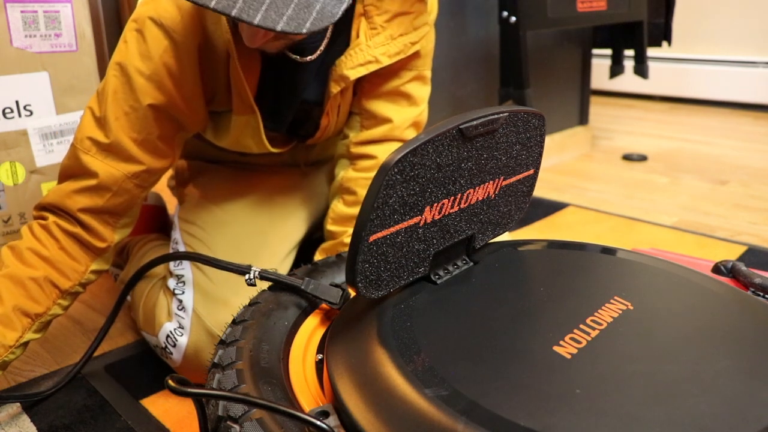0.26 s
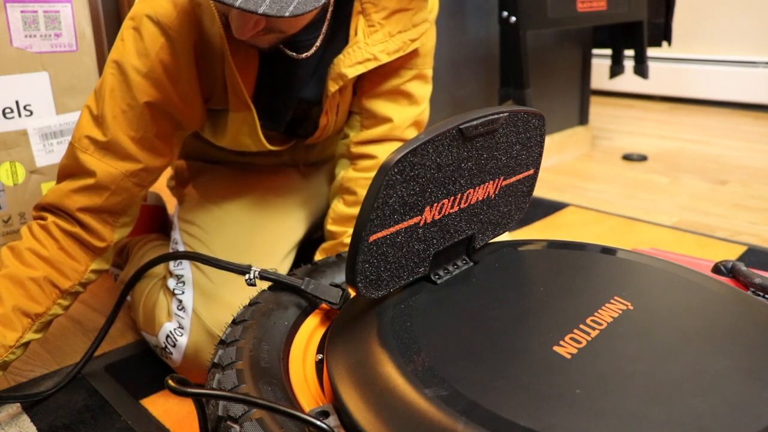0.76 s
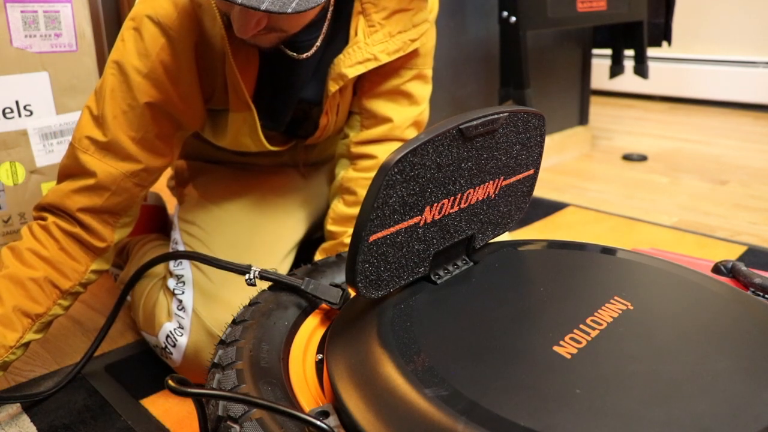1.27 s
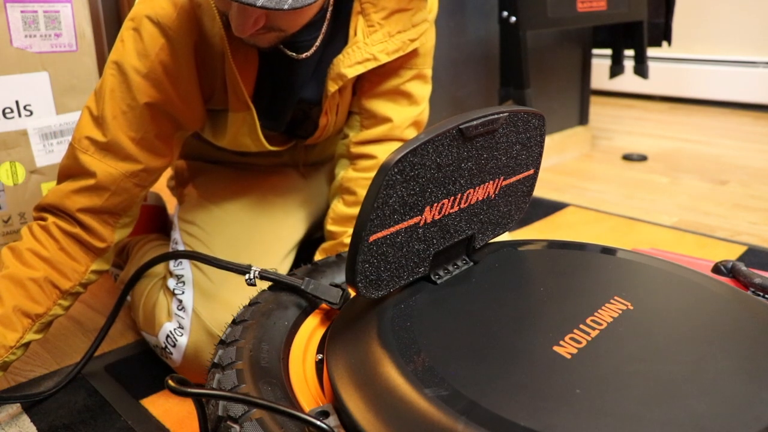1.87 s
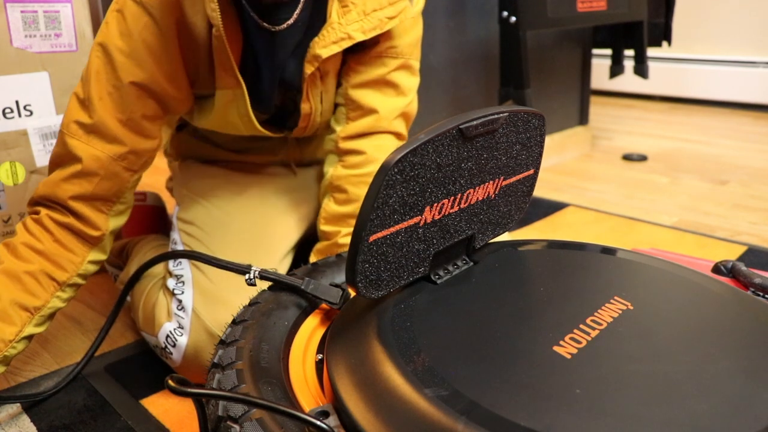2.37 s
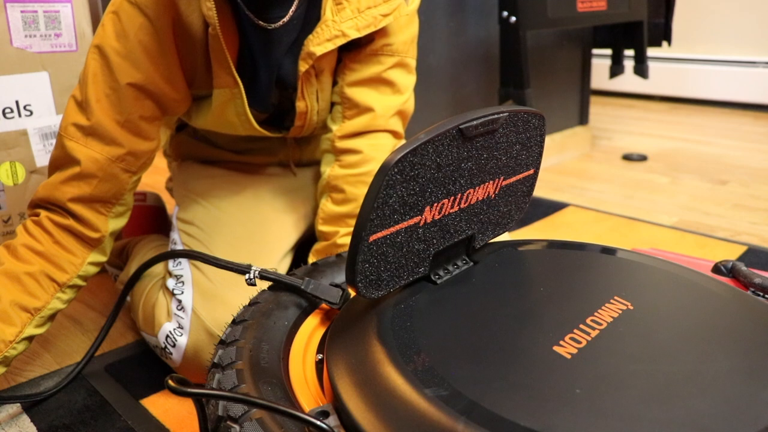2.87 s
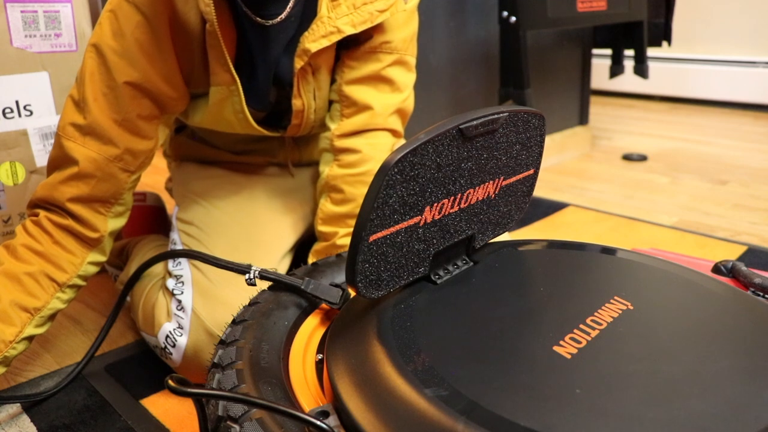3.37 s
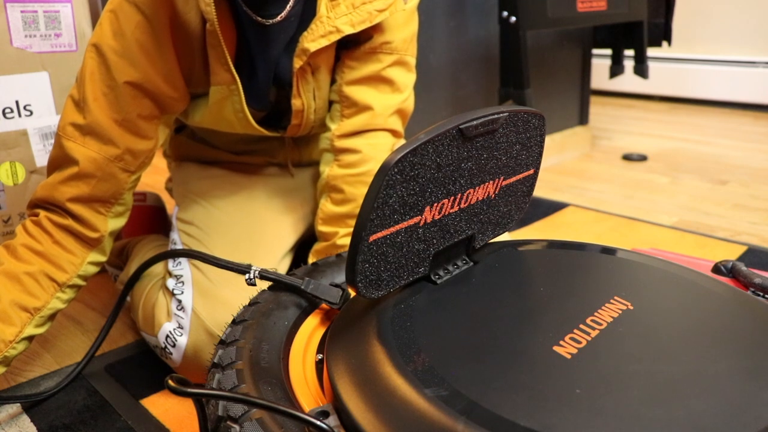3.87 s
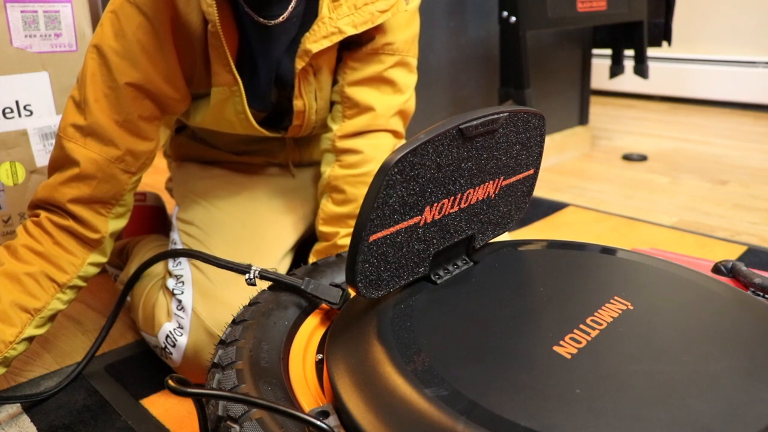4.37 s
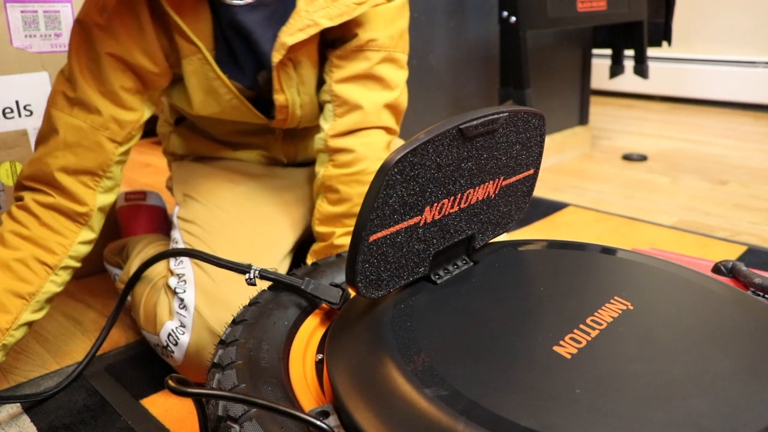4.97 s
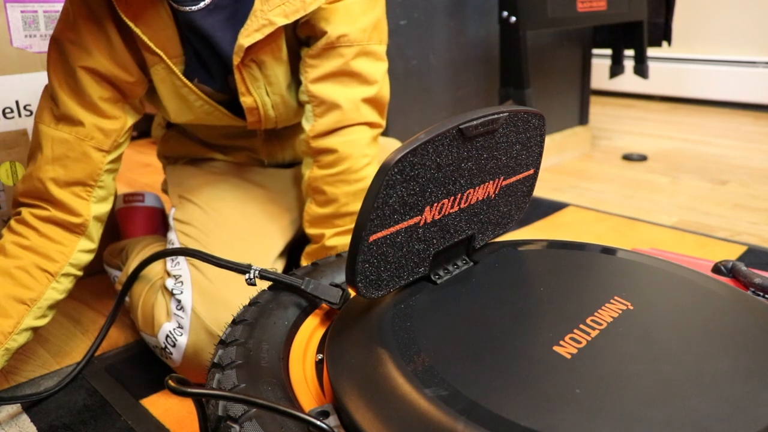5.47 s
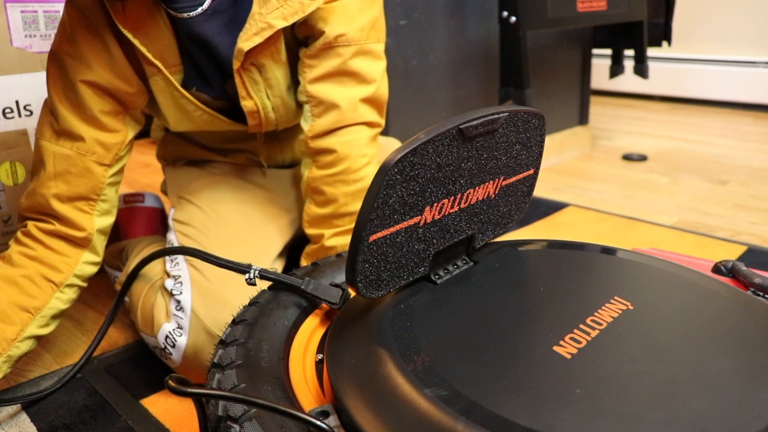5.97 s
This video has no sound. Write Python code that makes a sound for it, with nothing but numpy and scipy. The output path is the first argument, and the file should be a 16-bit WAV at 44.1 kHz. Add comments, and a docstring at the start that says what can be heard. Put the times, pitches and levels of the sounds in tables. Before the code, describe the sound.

Steady buzz and airy hiss of a small electric tyre pump, its low hum swelling against a wooden floor.

```python
"""Indoors, close on one microphone: a small electric piston pump on a wooden floor inflates a tyre.
It is already running at 103 strokes a second, roughened by its gears. Each stroke gives a low hum, a
pulse of air, a ring of the housing and a rattle; a valve ticks and air rasps through it. At 2.1 s the
pump is pressed to the floor and the hum swells; the rattle dips around 3.75 s. A second press at 4.9 s
eases off towards the end. All along, the pump slows a little as the pressure builds."""
import sys
import numpy as np
from scipy import signal
from scipy.fft import rfft, irfft, next_fast_len
from scipy.io import wavfile
from scipy.ndimage import map_coordinates

SR = 44100
rng = np.random.default_rng(int(sys.argv[2]) if len(sys.argv) > 2 else 0)


def store_wav(level_fs):
    """Save 16-bit WAV to argv[1]."""
    pcm = np.round(np.clip(np.atleast_2d(level_fs), -1, 1) * 32767)
    wavfile.write(sys.argv[1], SR, pcm.T.astype(np.int16))


N = 273861


def piston(turn, uneven, pulse_db, ring_db, rattle_db):
    """Front of the scene: each turn pushes out air, knocks the housing and rattles the linkage."""
    # play in the gears hurries or delays each stroke
    pulse_turn = turn + 0.0015 * uneven + 0.00072 * wobble(130)
    pulse = buzz(pulse_turn, first=5, last=22, lag=0.72, spread=0.3)
    ring = buzz(turn + 0.0019 * uneven, first=23, last=37, lag=0.64, spread=0.446)
    rattle = buzz(turn + 0.0012 * uneven, first=38, last=45, lag=0.84, spread=0.014)
    pulse *= amp(pulse_db + 0.1 * uneven)
    ring *= amp(ring_db + 0.36 * uneven + 0.044 * wobble(110))
    rattle *= amp(rattle_db + 0.35 * uneven + 0.23 * wobble(100))
    return pulse + ring + rattle


# The pump's buzz under light and heavy load: multiple of the stroke rate, relative level/dB
BUZZ_LIGHT = [(1, -20), (2, -13), (3, -17.5), (4, -18), (5, -12), (6, 2.5), (7, -5), (8, -6.5), (9, -29),
              (10, 4.5), (11, -6), (12, -12), (13, -8.5), (14, -10.5), (15, -3.5), (16, -12.5), (17, -13.5),
              (18, -10.5), (19, -13.5), (20, -15.5), (21, -35.5), (22, -28.5), (23, -25.5), (24, -7),
              (25, -13), (26, -10.5), (27, -8), (28, -6.5), (29, -7.5), (30, -24.5), (31, -38.5),
              (32, -18.5), (33, -36.5), (34, -15.5), (35, -19.5), (36, -19.5), (37, -39), (38, -38),
              (39, -20.5), (40, -22.5), (41, -31), (42, -18), (43, -16), (44, -31), (45, -22.5)]
BUZZ_HEAVY = [(1, -18), (2, -10.5), (3, -17), (4, -20), (5, -16), (6, 1), (7, -4.5), (8, -16), (9, -11.5),
              (10, -2.5), (11, -11), (12, -23.5), (13, -20.5), (14, -9.5), (15, -9.5), (16, -13), (17, -20),
              (18, -27), (19, -31), (20, -18), (21, -28), (22, -22.5), (23, -19), (24, -11.5), (25, -16.5),
              (26, -6), (27, -9.5), (28, -2), (29, -7.5), (30, -14.5), (31, -14), (32, -15.5), (33, -17),
              (34, -24.5), (35, -14), (36, -18), (37, -33.5), (38, -25), (39, -19), (40, -41), (41, -18.5),
              (42, -19.5), (43, -28), (44, -25), (45, -24)]
def buzz(turn, first, last, lag, spread):
    """Stroke harmonics first to last, arriving from lag into each turn over a spread (both in turns)."""
    load = piston_load()
    light_db = np.transpose(BUZZ_LIGHT)[1]
    heavy_db = np.transpose(BUZZ_HEAVY)[1]
    phase = ringing_phase((light_db + heavy_db) / 2)
    tone, power = np.zeros(N), np.zeros(N)
    for order in range(first, last + 1):
        row = order - 1
        gain = amp(light_db[row] + load * (heavy_db[row] - light_db[row]))
        late = spread * (order - first) ** 2 / (2 * (last - first))
        tone += gain * np.sin(2 * np.pi * (order * (turn - lag) - late) + phase[row])
        power += gain ** 2 / 2
    return tone / np.sqrt(power)


# The gears come round out of step with the piston: rate/(cycles per stroke), share
GEAR_BEATS = [(.36, 1), (.43, .4)]
def crank(start_hz=103.02, sag_hz=5.88, drift_turns=0.0037, slip_cycles=0.12):
    """Crank angle in turns, slowing as the tyre fills, and the unevenness the gears give each stroke."""
    stroke_hz = start_hz - sag_hz * tyre_pressure()
    turn = np.cumsum(stroke_hz) / SR + drift_turns * wobble(9)
    uneven = sum(share * np.sin(2 * np.pi * (beat * turn + slip_cycles * wobble(4.4)))
                 for beat, share in GEAR_BEATS)
    jitter = 0.00025 * wobble(100)
    return turn + jitter, uneven


def tyre_pressure(time_constant_s=13.45):
    """Pressure from 0 towards 1: it rises ever more slowly."""
    return 1 - np.exp(-np.arange(N) / SR / time_constant_s)


# Load on the piston: t/s, load (0 light, 1 heavy)
PISTON_LOAD = [(0, 0.38), (2.25, 0.72), (3.25, 1.02), (4.7, 1.05), (6.2, 1.15)]
def piston_load():
    """How hard the piston works at each moment."""
    return curve(PISTON_LOAD)


# The housing's ring at the microphone: t/s, level/dB
HOUSING_LEVEL = [(0, -38), (2.1, -39.5), (3.2, -37), (6.2, -36)]
def stroke_levels(lull_s=3.75, lull_half_width_s=1.3, lull_db=8.5):
    """Levels in dB of the air pulse, housing ring, rattle and valve; the rattle has one lull."""
    pressure, contact = tyre_pressure(), floor_contact()
    lull = np.exp(-((np.arange(N) / SR - lull_s) / lull_half_width_s) ** 2)
    pulse_db = -34.5 + 0.78 * piston_load() + 0.57 * contact
    rattle_db = -56 + 6 * pressure - lull_db * lull
    valve_db = -52.1 + 4.6 * pressure + 0.6 * contact
    return pulse_db, curve(HOUSING_LEVEL), rattle_db, valve_db


# Hum through the wooden floor: multiple of the stroke rate, loose level/dB, fully pressed level/dB
FLOOR_HUM = [(1, -60.5, -55), (2, -57, -47.5), (3, -53.5, -47), (4, -71.5, -51)]
# Faint gear tones beside the hum: multiple of the stroke rate, level/dB at load 0
GEAR_TONES = [(1.36, -86), (2.36, -72), (3.36, -79), (4.36, -79)]
def hum(turn):
    """The pump shakes the floor, more so in firm contact; its gears sing louder under load."""
    contact, load = floor_contact(), piston_load()
    floor, gears = np.zeros(N), np.zeros(N)
    for order, loose_db, pressed_db in FLOOR_HUM:
        gain = amp(loose_db + contact * (pressed_db - loose_db))
        lag = 0.126 * order  # the floor passes higher harmonics on a little later
        floor += gain * np.sin(2 * np.pi * order * (turn - lag))
    for multiple, db in GEAR_TONES:
        gears += amp(db + 3 * load + wobble(3)) * np.sin(2 * np.pi * multiple * turn)
    return np.sqrt(2) * (floor + gears)


# The pump is pressed down and let go: start/s, end/s, firmness (0-1), attack/s, release/s
FLOOR_PRESSES = [(2.1, 4.8, 0.8, .24, 0.074), (4.91, 5.25, 0.72, .1, 0.77)]
def floor_contact(own_weight=0.079):
    """How firmly the pump sits on the floor, 0-1: each press rises, holds and eases off."""
    t = np.arange(N) / SR
    contact = np.full(N, own_weight)
    for start, end, firmness, attack, release in FLOOR_PRESSES:
        rise = np.clip((t - start) / attack, 0, 1)
        ease = np.exp(-np.maximum(t - end, 0) / release)
        contact = np.maximum(contact, firmness * rise * ease)
    return contact


def valve(turn, uneven, valve_db, highpass_hz=4500):
    """The valve snaps shut once a turn and air spits past it, both ringing the cylinder head."""
    tick = unit(snaps(turn, uneven, lag=0.0408, scatter_s=14e-6, size_db=0.5))
    spit = unit(rng.standard_normal(N) * swell(turn, centre=0.069, sharpness=3.8, rest=0.082))
    drive = tick + amp(-8.5) * reflections(tick, t60=0.017) + amp(-4.5) * spit
    bright = filtered(cylinder_head(drive), lambda f: 1 / (1 + (highpass_hz / (f + 1)) ** 8))
    return amp(valve_db) * bright


# Valve and cylinder head resonances: f/Hz, width/Hz, relative level/dB at light load, at heavy load
HEAD_MODES = [(5320, 105, -24, -9.5), (5990, 76, -19, -6.5), (6430, 230, -14, -5), (7170, 350, -15, -10.5),
              (8300, 130, -4, -18.5), (9330, 335, -7.5, 2), (10030, 450, -10.5, 0), (10550, 280, -5, -6.5),
              (10880, 320, -20, -7), (11600, 260, -10, -11.5), (12330, 300, -19, -15.5)]
def cylinder_head(drive):
    """The head's resonances, whose balance changes with the load at an even overall level."""
    load = piston_load()
    ringing, power = np.zeros(N), np.zeros(N)
    for k, (hz, width, light_db, heavy_db) in enumerate(HEAD_MODES):
        gain = amp(light_db + load * (heavy_db - light_db))
        ringing += (-1) ** k * gain * filtered(drive, lambda f: resonance(f, hz, width))
        power += gain ** 2 * width
    return unit(ringing / np.sqrt(power))


# Air rushing through the cylinder, and the steady hiss of the hose: f/Hz, relative level/dB
RASP_SPECTRUM = [(40, -61), (200, -20.5), (450, -22.5), (620, -12.5), (820, -16.5), (1000, -10),
                 (1250, -18.5), (1600, -11.5), (2150, -16.5), (2850, -9.5), (3200, -12), (3950, -25),
                 (4400, -21), (4900, -40)]
HISS_SPECTRUM = [(200, -31), (4900, -5.5), (6500, -4.5), (7900, -6), (9700, -6), (12300, -3.5),
                 (13100, -18), (14450, -3), (15700, -14)]
def air(turn, ring_db, valve_db):
    """Air rasps during compression and hisses along the hose."""
    rush = rng.standard_normal(N) * swell(turn, centre=0.83, sharpness=0.47, rest=0.94)
    rasp = coloured(rush, RASP_SPECTRUM)
    hiss = coloured(rng.standard_normal(N), HISS_SPECTRUM)
    return amp(ring_db - 15) * rasp + amp(valve_db - 6) * hiss


# The fine buzz of the linkage: f/Hz, relative level/dB
LINKAGE_SPECTRUM = [(4200, -22), (4600, -6), (4850, -5), (5270, 3.5), (5900, -7), (6200, 0), (6650, -1),
                    (7000, -12), (7300, -4.5), (7900, -8), (8800, -5), (9350, -6), (10100, -1.5),
                    (12500, -17)]
def linkage(turn, uneven, rattle_db, valve_db):
    """The rod clacks once a turn, and its small regular contacts blur into a fine metallic buzz."""
    knocks = snaps(turn, uneven, lag=0.92, scatter_s=7e-6, size_db=-0.5)
    clack = unit(filtered(knocks, lambda f: resonance(f, hz=4330, width=520) ** 2))
    contacts = snaps(turn, uneven, lag=0.75, scatter_s=2e-6, size_db=0)
    fine_buzz = coloured(reflections(contacts, t60=0.049), LINKAGE_SPECTRUM)
    return amp(rattle_db - 3) * clack + amp(valve_db - 5.5) * fine_buzz


def reflections(x, t60):
    """Dense echoes off surfaces near the pump, whose pattern drifts slowly."""
    t = np.arange(SR // 10) / SR
    decay = amp(-60 * t / t60)
    opening, closing = [signal.fftconvolve(x, rng.standard_normal(len(t)) * decay)[:N] for _ in range(2)]
    drift = np.pi * np.arange(N) / N
    return unit(np.cos(drift) * opening + np.sin(drift) * closing)


# The quiet room around the microphone: f/Hz, relative level/dB
ROOM_SPECTRUM = [(20, -4), (55, 6), (90, -1), (160, -4), (500, -19), (4000, -31)]
def room_tone():
    """A faint low rush, far beneath the pump."""
    return amp(-83.5) * coloured(rng.standard_normal(N), ROOM_SPECTRUM)


def snaps(turn, uneven, lag, scatter_s, size_db):
    """One impulse at lag into each turn, a little uneven in time and size."""
    at = np.interp(np.arange(int(turn[-1]) + 1) + lag, turn, np.arange(N))
    time_error, size_error = rng.standard_normal((len(at), 2)).T
    at = np.clip(at + scatter_s * SR * time_error, 8, N - 10)
    size = amp(size_db * (size_error + 0.35 * uneven[at.astype(int)]))
    taps = at.astype(int)[:, None] + np.arange(-7, 9)
    impulses = size[:, None] * np.sinc(taps - at[:, None])  # each can fall between samples
    return np.bincount(taps.ravel(), impulses.ravel(), N)


def swell(turn, centre, sharpness, rest):
    """A smooth swell once a turn over a resting level."""
    return rest + np.exp(sharpness * (np.cos(2 * np.pi * (turn - centre)) - 1))


def ringing_phase(db, size=128):
    """Phase of each harmonic when a body with these levels is struck and rings out."""
    log_gain = np.log(amp(np.pad(db, (1, size - len(db)), mode="edge")))
    cepstrum = irfft(log_gain)[:size]
    return 2 * rfft(cepstrum, 2 * size).imag[1:len(db) + 1]


def resonance(f, hz, width):
    """Complex response at f of one mode centred on hz."""
    return 1j * f * width / (hz * hz - f * f + 1j * f * width)


def filtered(x, response):
    """x through a complex response of frequency."""
    size = next_fast_len(N + SR // 2)
    return irfft(rfft(x, size) * response(np.fft.rfftfreq(size, 1 / SR)), size)[:N]


def coloured(x, spectrum):
    """x shaped by rows of f/Hz, level/dB, at rms 1."""
    hz, db = np.transpose(spectrum)
    return unit(filtered(x, lambda f: amp(np.interp(np.log(f + 1), np.log(hz), db))))


def wobble(rate):
    """A smooth random curve, rate knots a second."""
    knots = rng.standard_normal(int(N * rate / SR) + 4)
    return map_coordinates(knots, [np.arange(N) * rate / SR])


def curve(rows):
    """One value per sample from rows of t/s, value."""
    return np.interp(np.arange(N) / SR, *np.transpose(rows))


def amp(db):
    """Decibels to gain."""
    return 10 ** (np.asarray(db) / 20)


def unit(x):
    """Scale to rms 1."""
    return x / np.sqrt(np.mean(x ** 2) + 1e-20)


def scene():
    """The running pump close up, the quiet room behind it, in mono."""
    turn, uneven = crank()
    pulse_db, ring_db, rattle_db, valve_db = stroke_levels()
    pump = hum(turn) + piston(turn, uneven, pulse_db, ring_db, rattle_db)
    pump += linkage(turn, uneven, rattle_db, valve_db)
    airflow = valve(turn, uneven, valve_db) + air(turn, ring_db, valve_db)
    return (pump + airflow + room_tone())[None]


def record(dry, top_hz=15750):
    """The camera's microphone channel keeps nothing above its band limit."""
    return filtered(dry[0], lambda f: f < top_hz)[None]


dry = scene()
out = record(dry)
store_wav(out)
```